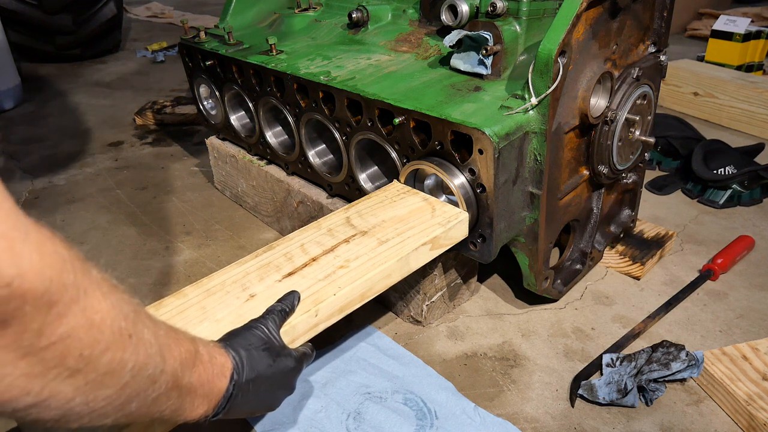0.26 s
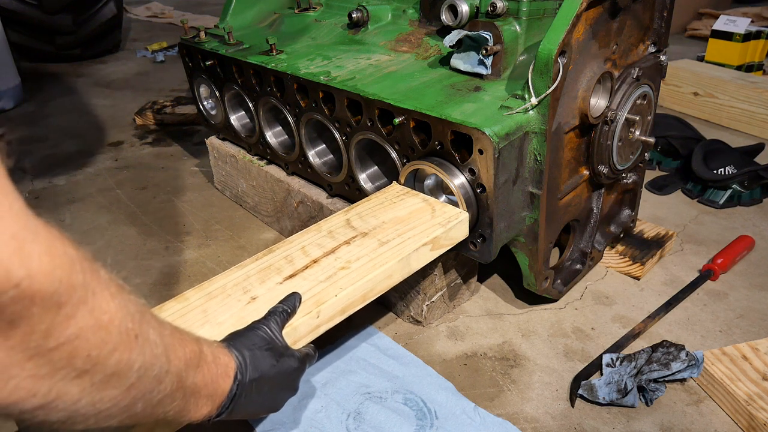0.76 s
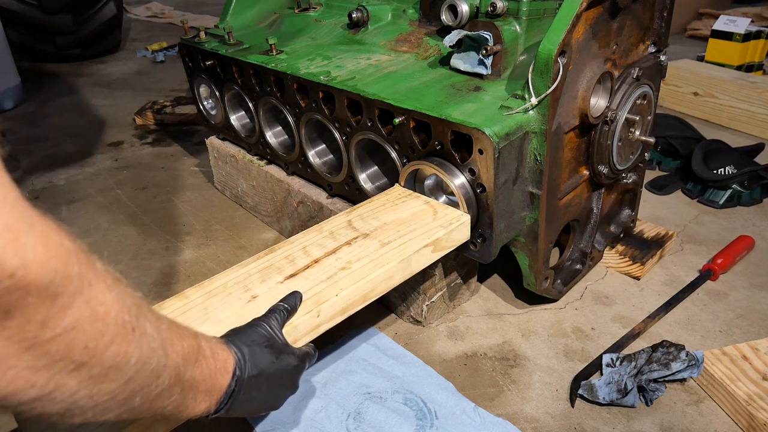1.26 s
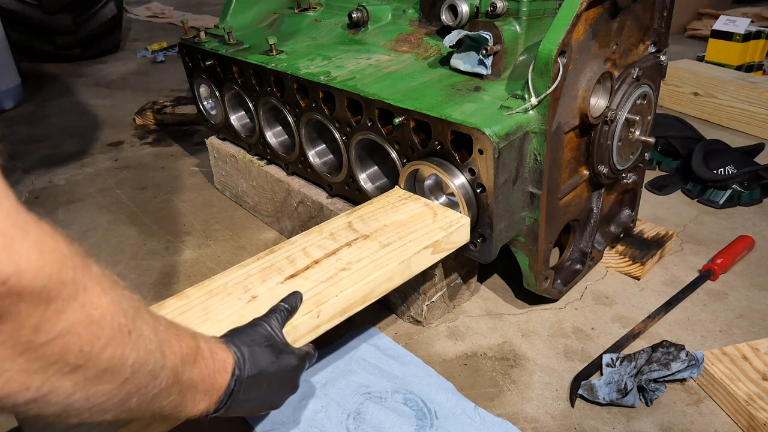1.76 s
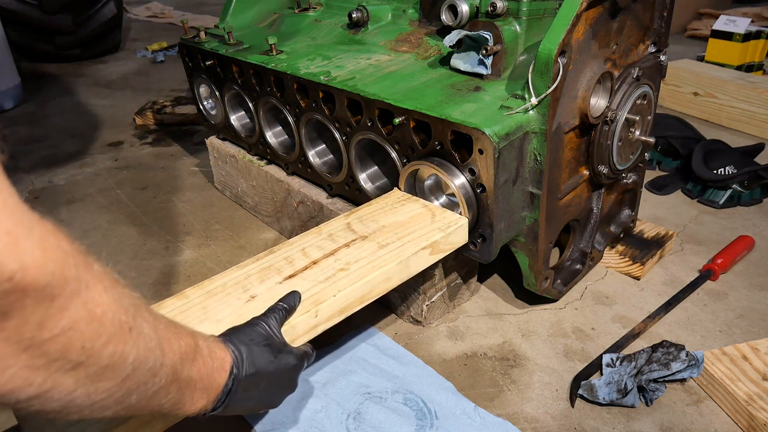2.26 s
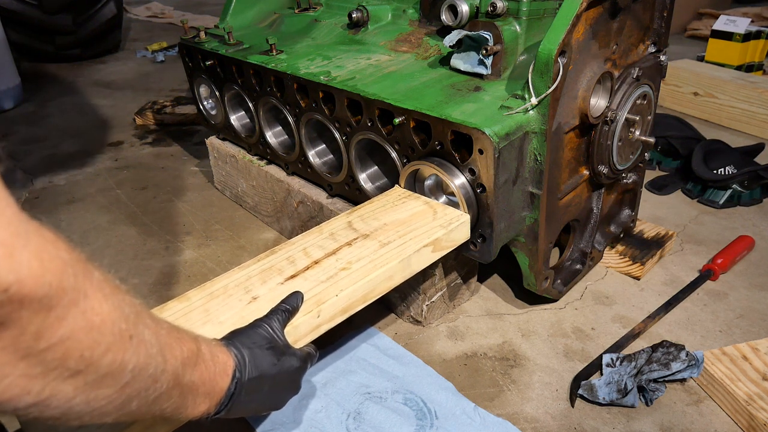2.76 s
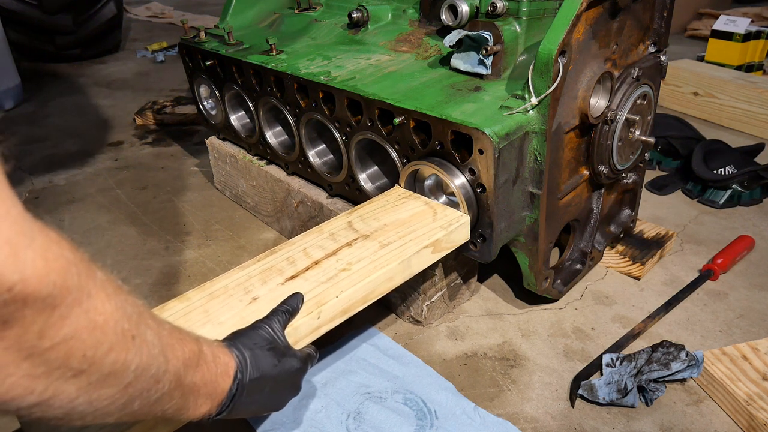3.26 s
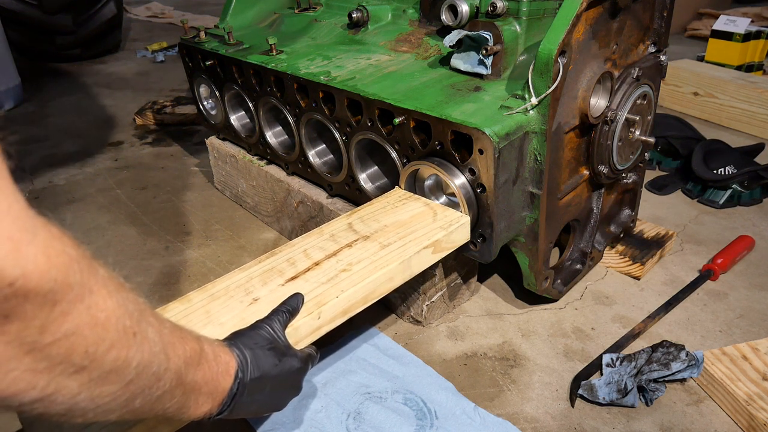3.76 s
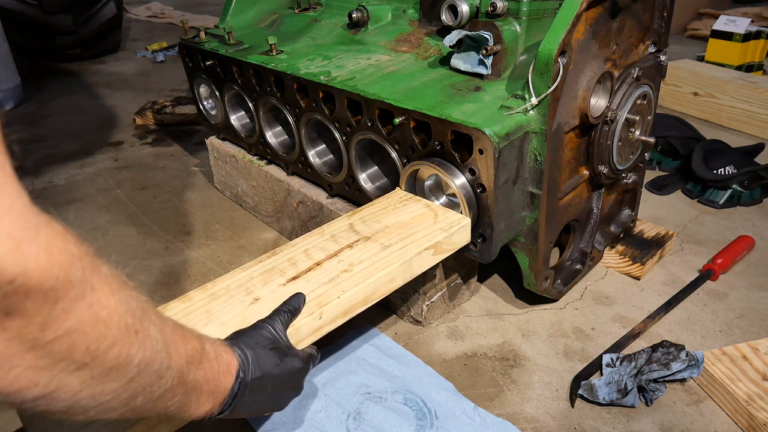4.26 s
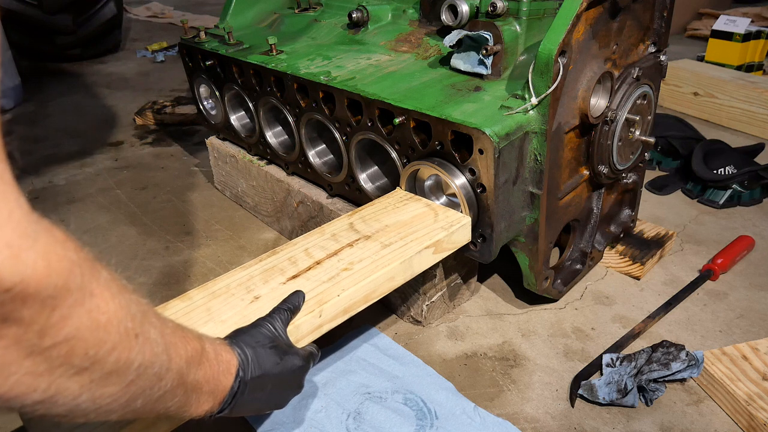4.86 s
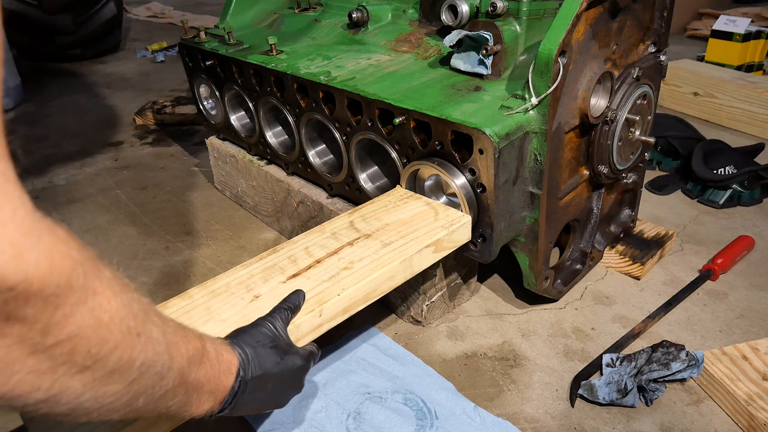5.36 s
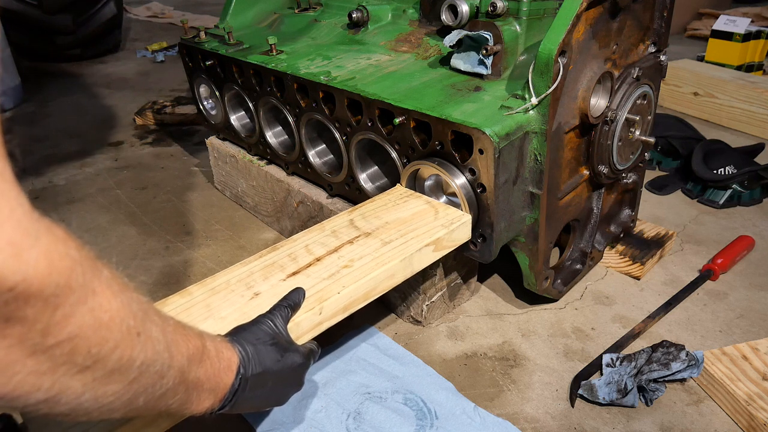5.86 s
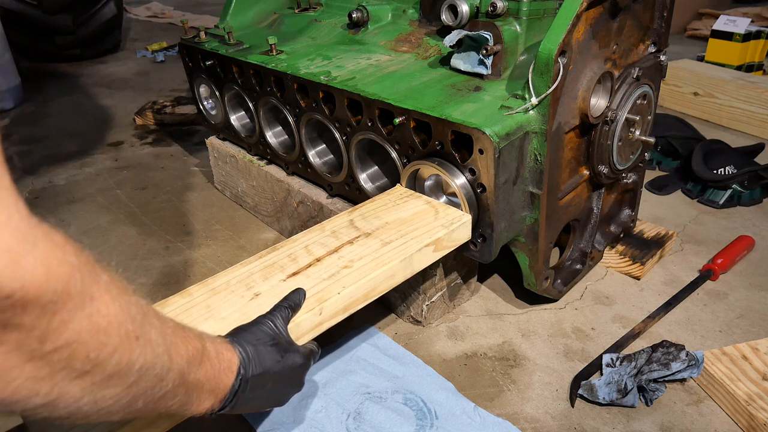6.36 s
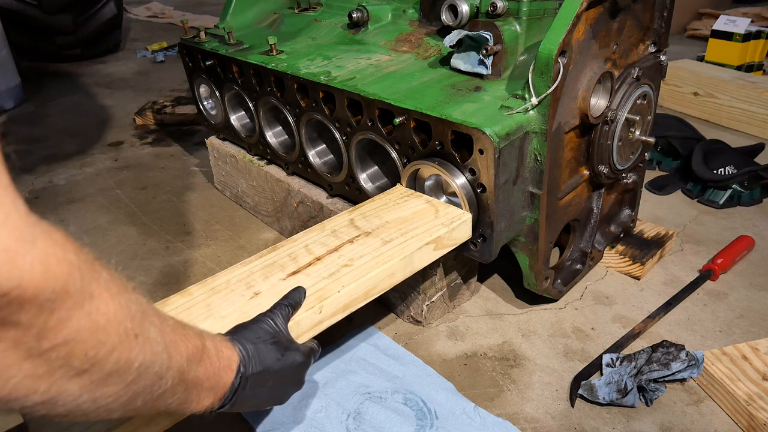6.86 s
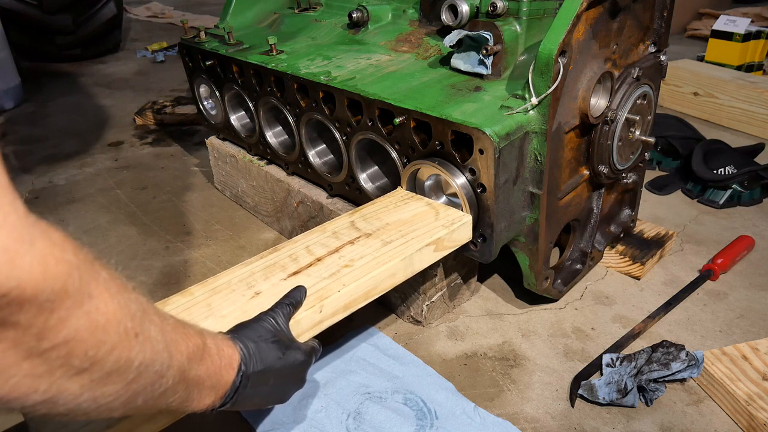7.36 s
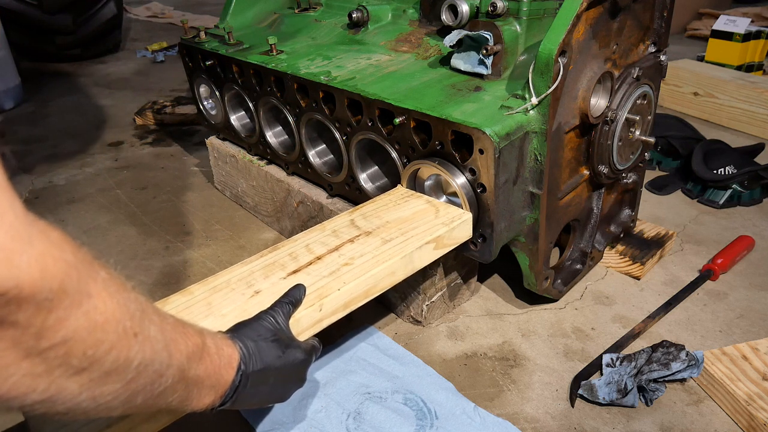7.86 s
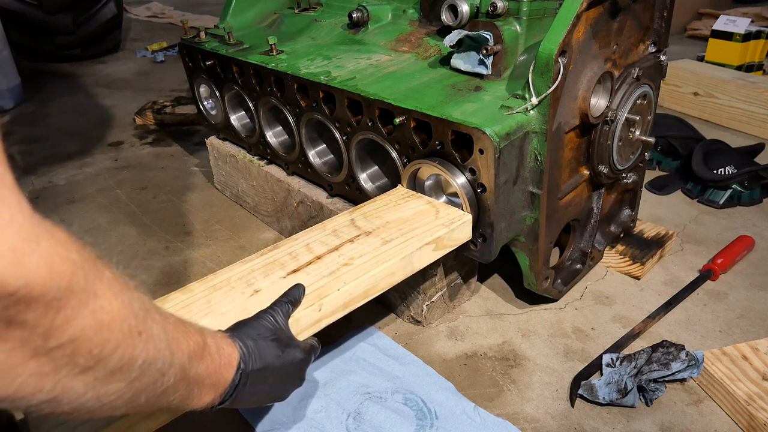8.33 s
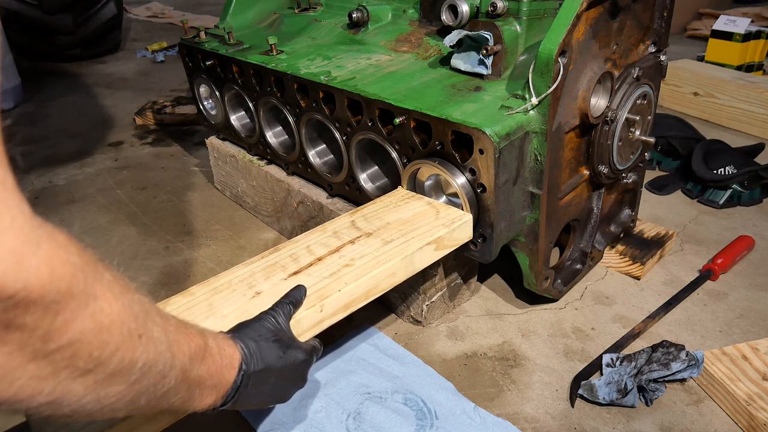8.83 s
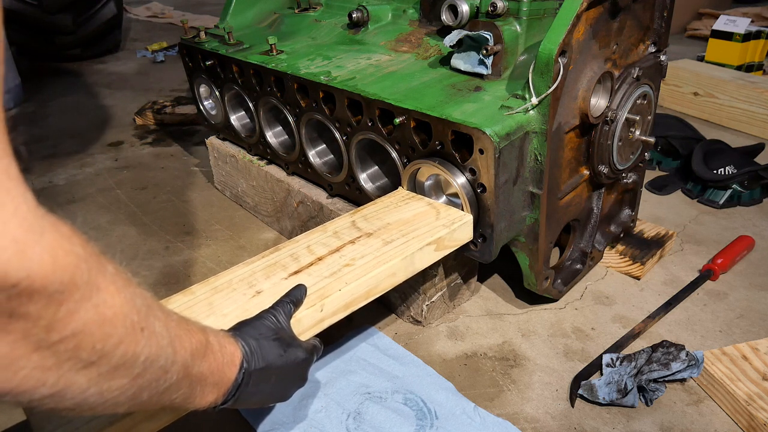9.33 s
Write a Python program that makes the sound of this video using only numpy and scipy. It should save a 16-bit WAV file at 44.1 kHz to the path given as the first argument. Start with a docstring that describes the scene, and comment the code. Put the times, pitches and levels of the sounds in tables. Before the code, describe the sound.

A hammer strikes a wooden board against a metal sleeve, hard evenly paced knocks with a short ring in an echoing workshop.

```python
"""Driving a sleeve into an engine block

Close up in a workshop, a hammer drives a steel sleeve home through a hand-held wooden board.
Each of the fifteen blows is a hard knock of wood with a short ring from board and sleeve; after the
last six the board bounces once. The room echoes over a background hiss that grows quieter.
The close microphone overloads, ducks, and lets the echo swell back."""
import sys
import numpy as np
from scipy import signal
from scipy.fft import rfft, irfft, next_fast_len
from scipy.io import wavfile

SR = 44100
rng = np.random.default_rng(int(sys.argv[2]) if len(sys.argv) > 2 else 0)


def dump(signal):
    """Clip the signal to [-1, 1] and save it as 16-bit WAV at the path in sys.argv[1]."""
    limited = np.clip(np.atleast_2d(signal).T, -1, 1)
    pcm = np.round(limited * 32767).astype(np.int16)
    wavfile.write(sys.argv[1], SR, pcm)


N = 422919
HIT_SAMPLES = 8192

# The workshop's background hiss, at first and once settled. Each row: frequency in Hz, density in dB.
EARLY_HISS_COLOUR = [(20, -21), (60, -32), (105, -10), (165, -13), (240, 0), (370, 1.5), (520, -2.5),
                     (900, -3.5), (1300, -4), (2400, -8.5), (4500, -15), (7500, -25.5), (10000, -24),
                     (15000, -39)]
LATE_HISS_COLOUR = [(20, -8), (60, -21), (105, -11.5), (170, -12.5), (290, -3), (520, -3.5), (700, -4),
                    (1000, -6.5), (1700, -8), (3000, -11.5), (4900, -23), (7500, -25), (10900, -27.5),
                    (15000, -41)]

# The hammer blows. Each row: start in seconds, force in dB, knock pitch in Hz, then board ring,
# sleeve slip and low thump, all three in dB relative to the force.
HAMMER_BLOWS = [(0.2694, -3, 590, -10.5, -34, -19), (0.9193, 14.5, 980, -1, -34, -21.5),
                (1.5265, 10, 693, -7.5, -14.5, -14.5), (2.1601, 11.5, 1113, -15.5, -17.5, -15),
                (2.772, 11.5, 1120, -12.5, -34, -21.5), (3.4767, 11.5, 1310, -9.5, -2, -23.5),
                (4.0955, 11.5, 1003, 1.5, -10, -18), (4.7017, 7.5, 1312, -22, -24, -17.5),
                (5.3078, 11, 1420, -24, -5, -18), (5.9349, 6, 833, -5.5, -11.5, -17.5),
                (6.5508, 7, 1384, -7.5, -14.5, -18.5), (7.1691, 7, 1370, -4.5, -7.5, -16.5),
                (7.7838, 1, 1586, -4, -4.5, -9.5), (8.3934, 7.5, 1464, -9.5, -3, -34),
                (9.0075, 7, 1494, -7, -7.5, -27)]
SQUARE_HZ = 1140  # a square blow knocks at this pitch
# Modes of the wood's thud, the board and the sleeve.
# Each row: frequency in Hz, level in dB, seconds to fall 60 dB.
THUD_MODES = [(294, -38, 0.088), (433, -13, 0.035), (585, 3, 0.034), (910, -9, 0.035)]
BOARD_MODES = [(1013, -18, 0.037), (1421.4, -1, 0.049), (1478, 0.5, 0.055), (2867, -10, 0.016)]
SLEEVE_MODES = [(1791, -3.5, 0.049), (2079, -3.5, 0.038), (2282, 5.5, 0.019), (2624, -2, 0.03),
                (2745, -6, 0.031), (3126, -13, 0.038), (3437, -17, 0.053), (3956, -14, 0.047),
                (4430, -21, 0.011), (4504, -12, 0.032)]
# Noise of the jolted block, the contact and steel sliding in the bore.
# Each row: frequency in Hz, density in dB.
THUMP_COLOUR = [(30, -34), (120, -3), (250, -4.5), (400, -2.5), (700, -13.5), (2000, -55), (15000, -80)]
CRACK_COLOUR = [(30, -19), (120, -48), (250, -9), (700, 1.5), (1400, 2.5), (2600, -8), (4500, -13.5),
                (6500, -19), (10000, -22), (15000, -61)]
SLIP_COLOUR = [(200, -28), (1200, -22), (2100, 1), (2700, 9.5), (3050, -5), (3500, 6.5), (3730, -6),
               (3960, 1.5), (4200, -0.5), (4530, 0), (4900, -6), (6700, -6.5), (8500, -17.5),
               (15000, -30.5)]

# How long the workshop rings. Each row: frequency in Hz, seconds to fall 60 dB.
ROOM_DECAY = [(100, 1.25), (300, 0.8056), (1000, 0.29), (1480, 0.7241), (2000, 0.6451), (4400, 1.2636),
              (8000, 0.79), (14000, 0.48)]
# The tone of its echo. Each row: frequency in Hz, level in dB.
ECHO_COLOUR = [(50, -22), (130, -8), (240, 9), (500, 5.5), (1000, 7.5), (1450, -1.5), (2200, 0), (4400, 2),
               (8000, -2), (14000, 8.5)]
# Room sound at the microphone. Each row: frequency in Hz, left-right likeness from 0 to 1.
ROOM_LIKENESS = [(40, 0.075), (180, 0.76), (550, 0.83), (1650, 0.74), (5000, 0.85), (15000, 1)]

# The board drops back on the sleeve. Each row: start in seconds, gain in dB, pitch in Hz.
BOARD_BOUNCES = [(5.9972, -3.5, 915), (6.6056, -0.5, 1300), (7.232, -12, 1340), (7.8454, -3, 1080),
                 (8.4493, -3, 1300), (9.0797, -8, 1420)]
# Noise of that light touch. Each row: frequency in Hz, density in dB.
TAP_COLOUR = [(100, -11), (450, -3.5), (1500, -6), (2700, -10.5), (5000, -32), (15000, -48)]


def gain_of(db):
    """Decibels to amplitude."""
    return 10 ** (np.asarray(db) / 20)


def unit_rms(x):
    """Scales to rms 1."""
    return x / np.sqrt(np.mean(x ** 2) + 1e-20)


def read(points, hz):
    """Reads a table on a log-frequency axis."""
    table_hz, value = np.transpose(points)
    return np.interp(np.log(hz + 1), np.log(table_hz + 1), value)


def add(mix, start_s, sound):
    """Mixes a stereo sound in at its start time."""
    part = mix[:, round(start_s * SR):][:, :sound.shape[1]]
    part += sound[:, :part.shape[1]]


def placed(x, left_db):
    """Sets a mono sound in the stereo picture, louder on the left by left_db."""
    return x * gain_of([[left_db / 2], [-left_db / 2]])


def smoothed(x, corner_hz):
    """Smooths away what is faster than the corner."""
    pole = np.exp(-2 * np.pi * corner_hz / SR)
    return signal.lfilter([1 - pole], [1, -pole], x)


def diffuse(size, colour):
    """Coloured stereo noise that reaches the microphone from all sides."""
    hz = np.fft.rfftfreq(size, 1 / SR)
    left, unrelated = rfft(rng.standard_normal((2, size)))
    likeness = np.clip(read(ROOM_LIKENESS, hz), -1, 1)
    right = likeness * left + np.sqrt(1 - likeness ** 2) * unrelated
    return irfft(np.array([left, right]) * gain_of(read(colour, hz)), size)


def background_hiss(early_db=-32.5, late_db=-45, settle_s=5.88):
    """Background hiss of the workshop that grows quieter and changes colour, then holds steady."""
    settled = np.clip(np.arange(N) / SR / settle_s, 0, 1)
    hiss = np.sqrt(1 - settled) * unit_rms(diffuse(next_fast_len(N), EARLY_HISS_COLOUR))[:, :N]
    hiss += np.sqrt(settled) * unit_rms(diffuse(next_fast_len(N), LATE_HISS_COLOUR))[:, :N]
    return placed(hiss * gain_of(early_db + (late_db - early_db) * settled), left_db=-0.6)


def knock(hz, swell_s):
    """A few heavily damped cycles of the wood, peaking after swell_s."""
    t = np.arange(HIT_SAMPLES) / SR
    return t / swell_s * np.exp(1 - t / swell_s) * np.sin(2 * np.pi * hz * t)


def ring(modes, rise_s, detune):
    """Struck modes die away; every blow lands a little differently and shifts their pitch."""
    t = np.arange(HIT_SAMPLES) / SR
    tones = np.zeros(HIT_SAMPLES)
    for k, (hz, db, t60) in enumerate(modes):
        pitch = hz * (1 + detune * rng.standard_normal())
        tones += (-1) ** k * gain_of(db - 60 * t / t60) * np.sin(2 * np.pi * pitch * t)
    return tones * (1 - np.exp(-t / rise_s))


def burst(colour, decay_s, rise_s):
    """A short dying burst of noise whose spectrum keeps close to the given colour."""
    t, hz = np.arange(HIT_SAMPLES) / SR, np.fft.rfftfreq(HIT_SAMPLES, 1 / SR)
    envelope = gain_of(-60 * t / decay_s) * (1 - np.exp(-t / rise_s))
    spectrum = rfft(envelope * rng.standard_normal(HIT_SAMPLES))
    flat = spectrum / (abs(spectrum) + 1e-12)
    noise = irfft(gain_of(read(colour, hz)) * flat) * gain_of(-10 * t / decay_s)
    return noise * np.linalg.norm(envelope) / np.linalg.norm(noise)


def wood_knock(force_db, hz):
    """Wood crushes on the steel rim with a knock and a thud; lower-pitched blows thud more."""
    knock_db = 2.5 + 0.48 * force_db
    thud_db = -14.5 + 1.25 * force_db - 10 * np.log2(hz / SQUARE_HZ)
    thud = gain_of(thud_db) * ring(THUD_MODES, rise_s=0.0033, detune=0.0048)
    return gain_of(knock_db) * knock(hz, swell_s=0.00064) + thud


def block_thump(db):
    """The block jolts on its wooden supports."""
    return gain_of(db) * burst(THUMP_COLOUR, decay_s=0.041, rise_s=0.00066)


def sleeve_ring(force_db, hz):
    """The steel sleeve rings, more under squarer, higher-pitched blows."""
    db = force_db - 8.5 + 4.0 * np.log2(hz / SQUARE_HZ)
    return gain_of(db) * ring(SLEEVE_MODES, rise_s=0.0015, detune=0.0065)


def contact_crack(force_db, top_hz=4000, db_per_doubling=0.5):
    """The contact cracks, brighter under harder blows; top_hz is the corner at a force of 0 dB."""
    crack = gain_of(-3.5 + 0.73 * force_db) * burst(CRACK_COLOUR, decay_s=0.028, rise_s=0.0005)
    return smoothed(crack, top_hz * 2 ** (force_db / db_per_doubling))


def sleeve_slip(db):
    """Steel scrapes as the sleeve slips a little deeper into the bore."""
    return gain_of(db) * burst(SLIP_COLOUR, decay_s=0.022, rise_s=0.0012)


def thin_bass(x, corner_hz=186.0):
    """The close sound reaches the microphone with little bass."""
    return signal.sosfilt(signal.butter(2, corner_hz, "high", fs=SR, output="sos"), x)


def hammer_blow(force_db, hz, ring_db, slip_db, thump_db):
    """One blow from close by: knock and crack near the centre, board and sleeve ringing to the left."""
    wood = wood_knock(force_db, hz) + block_thump(force_db + thump_db)
    board = gain_of(force_db + ring_db) * ring(BOARD_MODES, rise_s=0.00043, detune=0.0026)
    sleeve = sleeve_ring(force_db, hz)
    crack = contact_crack(force_db)
    slip = sleeve_slip(force_db + slip_db)
    ringing = placed(board, left_db=4.5) + placed(sleeve + slip, left_db=2.2)
    return thin_bass(ringing + placed(wood, left_db=-0.3) + placed(crack, left_db=0.6))


def with_flank_reflection(sound, side_db=-11.5, delay_s=0.001072):
    """A first reflection off the flank of the block arrives from the side and widens the blow."""
    t = np.arange(sound.shape[1]) / SR
    side = gain_of(side_db) * np.interp(t - delay_s, t, sound.mean(0), left=0)
    return sound + np.array([-side, side])


def workshop_echo(sound, wet_db=-7.5, build_s=0.0082):
    """A dense echo builds up as sound returns from the walls, each band dying at its own speed."""
    hz, frame_s, bands = signal.stft(diffuse(SR, ECHO_COLOUR), SR, nperseg=256)
    decay = gain_of(-60 * frame_s / read(ROOM_DECAY, hz)[:, None])
    tail = signal.istft(bands * decay, SR, nperseg=256)[1]
    t = np.arange(tail.shape[1]) / SR
    tail *= (1 - np.exp(-(t / build_s) ** 2)) / np.sqrt(SR / 20)
    return gain_of(wet_db) * signal.fftconvolve(sound.mean(0)[None], tail, axes=1)


def board_bounce(db, hz):
    """The board drops back on the sleeve with a light knock, a faint ring and a tap."""
    wood = gain_of(-2.5) * knock(hz, swell_s=0.00046)
    wood += gain_of(-11.5) * ring(BOARD_MODES, rise_s=0.00079, detune=0.0019)
    tap = gain_of(-6.5) * burst(TAP_COLOUR, decay_s=0.03, rise_s=0.000087)
    return gain_of(db) * thin_bass(placed(wood, left_db=3.5) + tap)


def overshoot_db(dry, threshold_db, recovery_db_per_s, attack_s):
    """How far the peaks reach over a threshold, followed with a lag and let go at a steady rate."""
    peak_db = 20 * np.log10(abs(dry).max(0) + 1e-9)
    fall_db = np.arange(N) * recovery_db_per_s / SR
    held_db = np.maximum.accumulate(peak_db + fall_db) - fall_db
    return smoothed(np.maximum(held_db - threshold_db, 0), 1 / (2 * np.pi * attack_s))


def scene():
    """Close blows and bounces with their echoes, over the background hiss."""
    mix = background_hiss()
    for start_s, force_db, hz, *parts_db in HAMMER_BLOWS:
        blow = hammer_blow(force_db, hz, *parts_db)
        echo_db = -3 + np.log2(hz / SQUARE_HZ)  # sharper blows carry further into the room
        add(mix, start_s, with_flank_reflection(blow))
        add(mix, start_s, gain_of(echo_db) * workshop_echo(blow))
    for start_s, db, hz in BOARD_BOUNCES:
        bounce = board_bounce(db, hz)
        add(mix, start_s, bounce)
        add(mix, start_s, gain_of(-6.0) * workshop_echo(bounce))
    return mix


def record(dry, ride_share=0.093, low_cut_hz=95.0, high_cut_hz=15700):
    """The close microphone clips until limiter and gentle gain control duck; both recover in the echo."""
    limit_db = overshoot_db(dry, threshold_db=0.0, recovery_db_per_s=67.5, attack_s=0.0015)
    ride_db = overshoot_db(dry, threshold_db=-23.5, recovery_db_per_s=63.5, attack_s=0.011)
    ducked = dry / gain_of(limit_db + ride_share * ride_db)
    clipped = 0.87 * ducked / (1 + ducked ** 8) ** (1 / 8)
    thinned = signal.sosfilt(signal.butter(1, low_cut_hz, "high", fs=SR, output="sos"), clipped)
    high_cut = signal.firwin(127, high_cut_hz, window=("kaiser", 8), fs=SR)
    return signal.oaconvolve(thinned, high_cut[None], "same")


dry = scene()
out = record(dry)
dump(out)
```